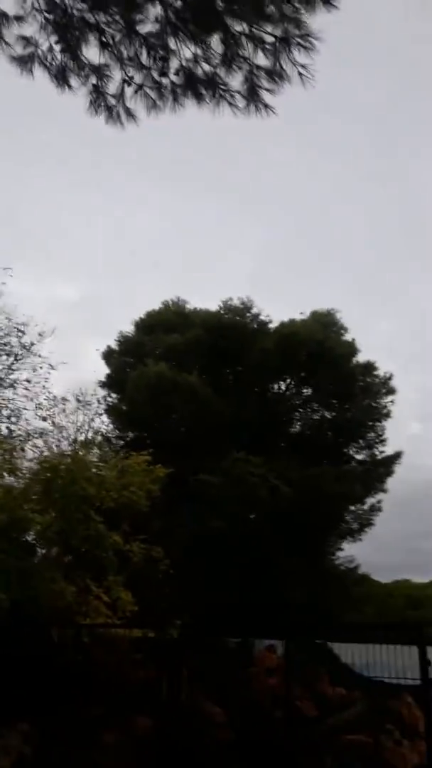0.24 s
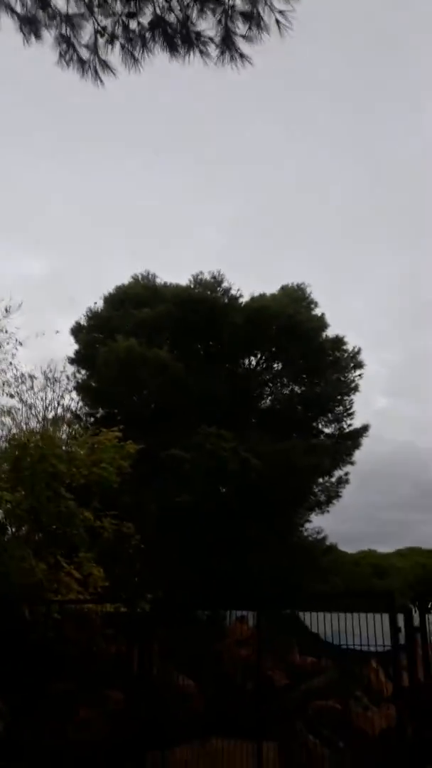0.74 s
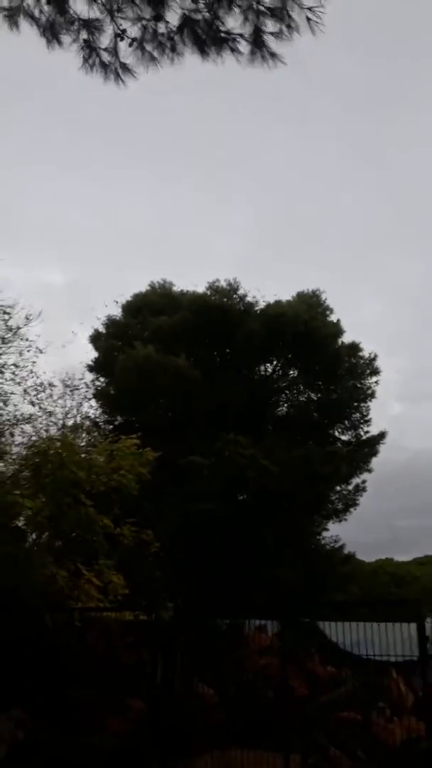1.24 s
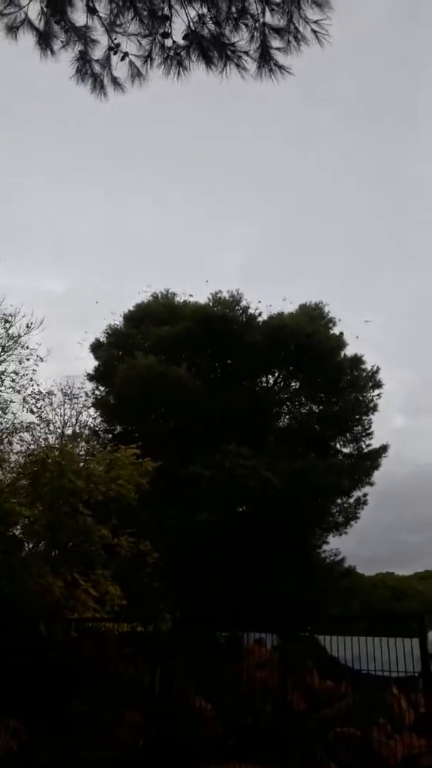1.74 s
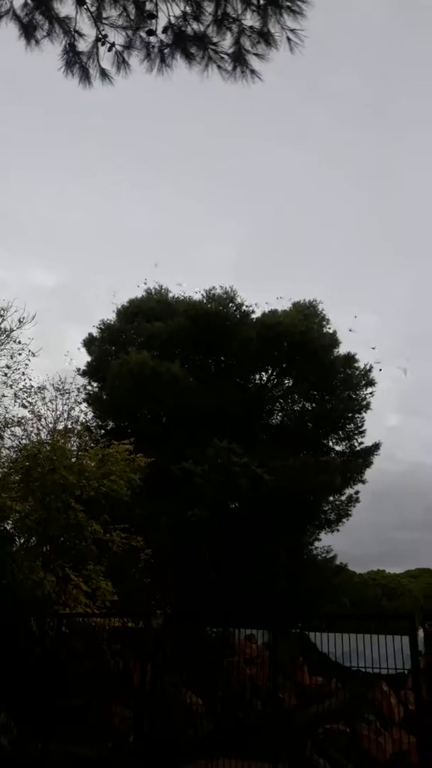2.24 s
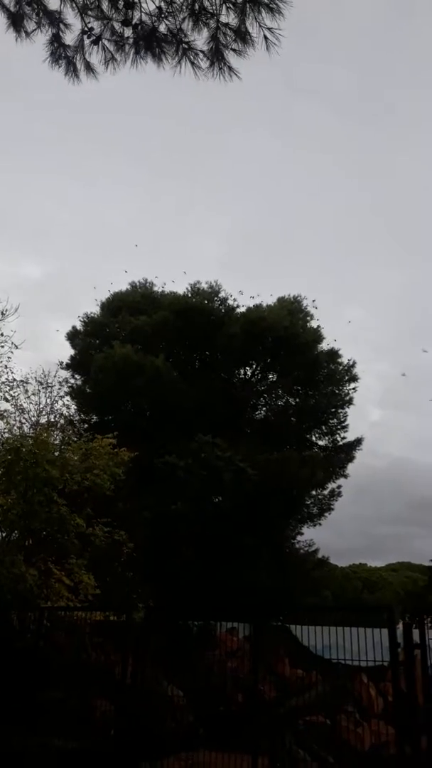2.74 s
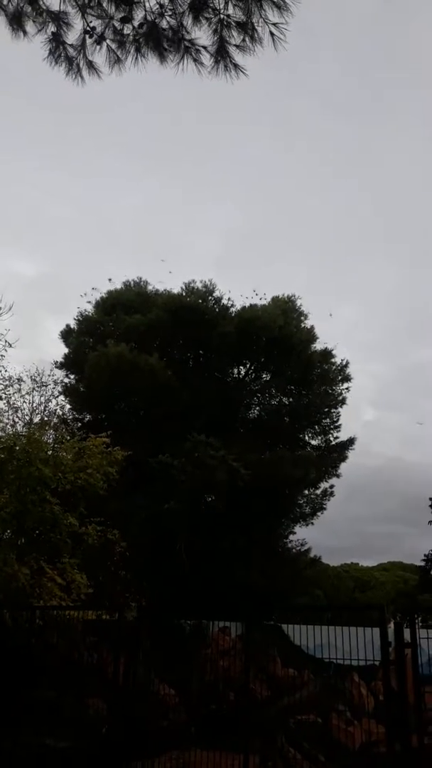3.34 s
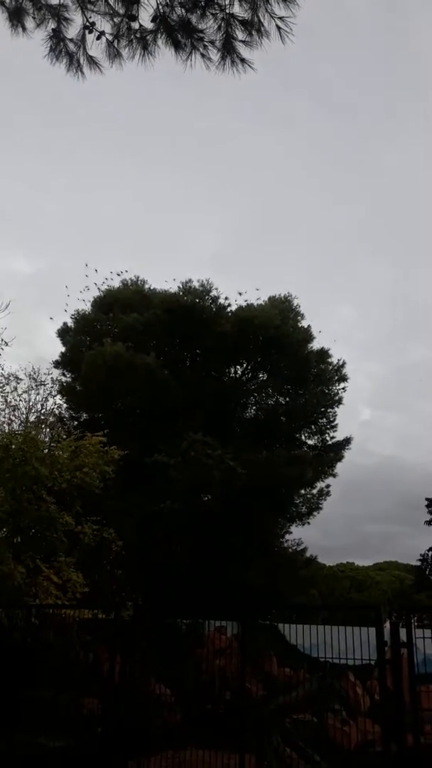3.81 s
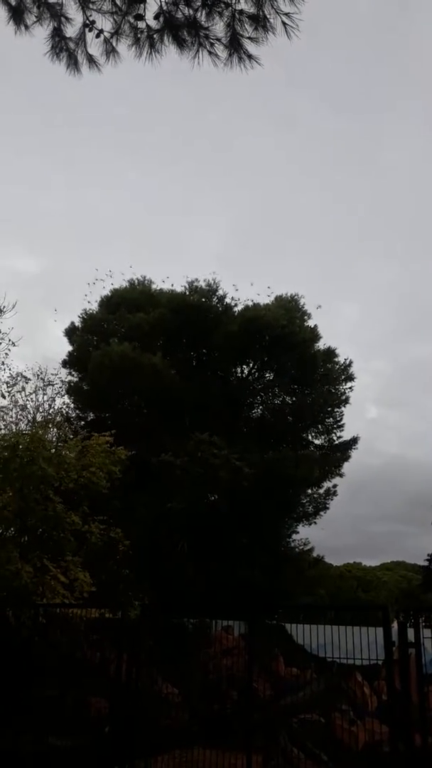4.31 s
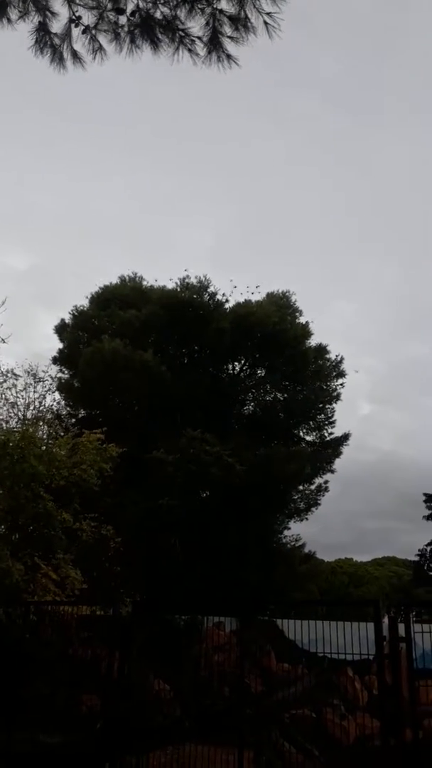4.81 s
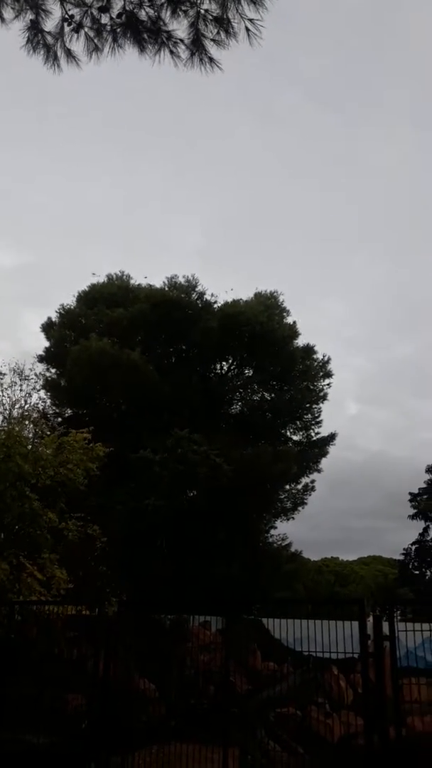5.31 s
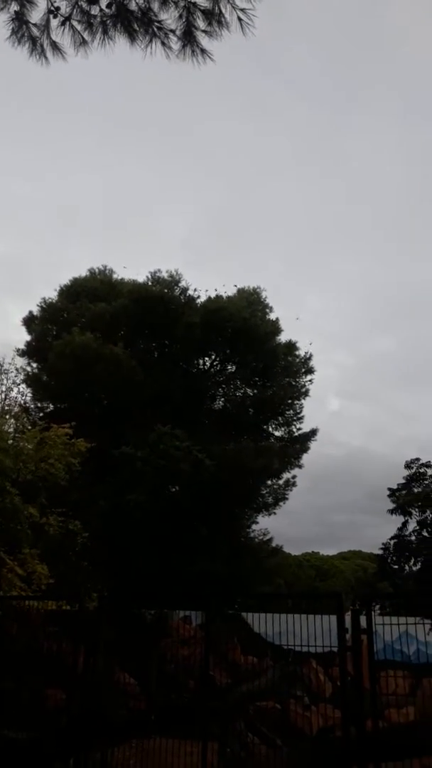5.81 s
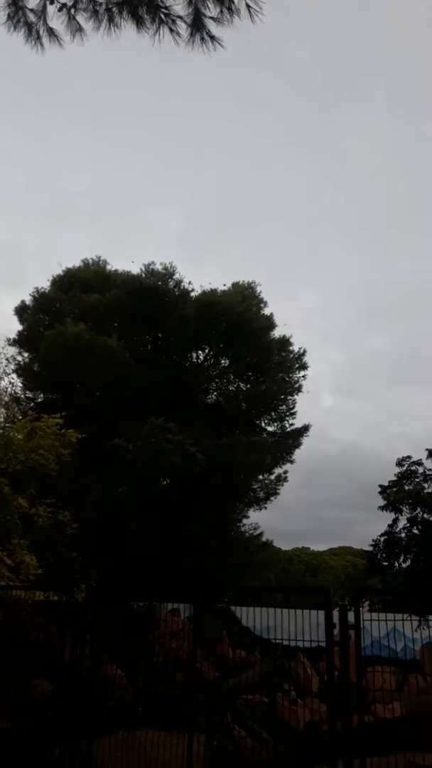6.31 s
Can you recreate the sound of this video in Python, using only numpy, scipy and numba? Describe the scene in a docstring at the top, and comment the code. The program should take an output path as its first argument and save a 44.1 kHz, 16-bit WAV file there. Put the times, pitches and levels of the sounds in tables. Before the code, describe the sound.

A huge flock of starlings chatters in trees across a park for the whole six and a half seconds. Thousands of tiny whistles and rattles blend into a dense, steady hiss, slightly brighter in the first second and a little softer in the middle. Far traffic hums faintly underneath, along with very faint microphone hiss.

Short gliding whistles from nearer birds stand out, with a slight scatter from the trees. Thin, high ones cluster in the first second, the clearest at about 0.5 seconds. Lower ones come around 3 seconds, in a small run from 3.4 to 3.8, and again near 4.9 and 6.

At about 0.6 seconds a finger briefly brushes the phone and knocks it once, dully. Six tiny digital clicks fall between 0.4 and 1.6 seconds, with two more at about 6.2 and 6.5.

```python
"""A huge starling roost in trees across a park: thousands of whistles and rattles a second melt into a hiss.
Each note is a gliding sine; rattles throb; the farthest birds blur into shaped noise.
Nearer whistles stand out, scattered by the trees. Far traffic hums under faint microphone hiss.
A finger brushes the phone and knocks it once; digital glitches click. One microphone, two channels."""
import sys
import numpy as np
from scipy import signal
from scipy.fft import rfft, irfft
from scipy.io import wavfile
from numba import njit

SR = 44100
rng = np.random.default_rng(int(sys.argv[2]) if len(sys.argv) > 2 else 0)


def wav_out(sig):
    """Save sig, one row per channel (or a flat mono array), as 16-bit PCM at SR to the path in sys.argv[1]."""
    wavfile.write(sys.argv[1], SR, np.round(np.clip(np.atleast_2d(sig).T, -1, 1) * 32767).astype(np.int16))


N = 288855

# Far traffic spectrum (frequency [Hz], relative density [dB])
TRAFFIC_SPECTRUM = [(24, -39), (40, -5.5), (81, -1.5), (227, -4), (350, -5), (422, -5.5), (503, -4.5),
                    (599, -3.5), (1000, -5), (1300, -3), (2200, -120)]
# Microphone hiss (time [s], level [dB])
HISS_LEVELS = [(0.0, -58), (1.18, -58), (1.82, -60), (4.34, -59.5), (4.56, -59.5), (6.2, -58.5),
               (6.55, -60)]
# Microphone hiss spectrum (frequency [Hz], relative density [dB])
HISS_SPECTRUM = [(3000, -48), (6000, -15), (10500, -3.5), (12000, -2), (13500, -4), (15800, -3.5)]
# Digital clicks (time [s], impulse level [dB])
GLITCHES = [(.3856, -23), (.5859, -22), (.8676, -20), (1.097, -24), (1.313, -21), (1.5945, -25),
            (6.1918, -22), (6.4893, -29)]
# Finger on the case (mid time [s], spread [s], centre [Hz], width [Hz], level [dB])
BRUSH_SWELLS = [(.575, 0.033, 13000, 6000, -53), (.58, 0.0041, 1760, 600, -31),
                (.601, 0.0096, 1480, 905, -29.5), (.625, 0.0091, 1700, 700, -36),
                (.614, .012, 250, 220, -39), (6.19, .06, 11000, 4000, -63)]
# Nearer birds (time [s], length [s], start pitch [Hz], end pitch [Hz], level [dB])
NEAR_WHISTLES = [ (.13, 0.13, 7450, 7100, -44), (.225, 0.16, 2870, 2880, -42.5),
                 (.462, .05, 7350, 7320, -44), (0.513, .08, 7250, 6100, -35), (.71, .053, 6850, 6670, -41),
                 (.72, .1, 8500, 8000, -53), (.85, .064, 3480, 3420, -41), (1.0, .05, 7400, 7250, -45),
                 (1.002, 0.082, 3100, 2870, -40.5), (1.614, .08, 9200, 8800, -61),
                 (1.99, .1, 8600, 8550, -67), (2.48, .13, 7650, 7600, -55), (2.62, .05, 7200, 7240, -45),
                 (2.925, 0.097, 8550, 8050, -59), (2.96, .14, 3060, 3170, -44.5),
                 (3.408, 0.23, 3470, 2750, -42), (3.48, .085, 2750, 2570, -46),
                 (3.587, 0.12, 3030, 3770, -42), (3.653, .036, 2470, 2290, -38),
                 (3.73, .067, 2430, 2290, -45), (3.96, .07, 12150, 12400, -65),
                 (4.856, 0.13, 2730, 2690, -40), (4.88, .09, 8480, 8420, -64), (5.77, .04, 9000, 8700, -59),
                 (5.99, .08, 2980, 2850, -46)]
# Roost loudness (time [s], base level [dB], treble gain [dB])
ROOST_LEVELS = [(0.0, -28.5, 1.5), (0.33, -29.5, 3.5), (0.42, -30, 3), (0.58, -29, 5), (0.64, -29.5, 3),
                (1.5, -30.5, 1), (2.53, -31.5, 0.5), (3.5, -31, -2), (4.7, -30, 0), (5.6, -30, -.5),
                (6.55, -29, -0.5)]
# Roost spectrum at the microphone (frequency [Hz], relative density [dB])
ROOST_SPECTRUM = [(590, -21.5), (1000, -8.5), (1890, -3), (2400, 0), (3890, -4.5), (4580, -2), (6240, 0.5),
                  (6870, -4), (7940, -17), (10000, -30.5), (13000, -62), (22000, -120)]
# Air absorption on the farthest birds (frequency [Hz], gain [dB])
AIR_ABSORPTION = [(6800, 0), (8500, -6)]


def undb(db):
    return 10 ** (np.asarray(db) / 20)


def level(x, rms_db):
    return x * undb(rms_db) / np.sqrt(np.mean(x ** 2))


def curve(table):
    """Columns of a time table, one value a sample."""
    time_s, *columns = np.transpose(table)
    return [np.interp(np.arange(N) / SR, time_s, column) for column in columns]


def colour(x, spectrum):
    """Filter by (frequency [Hz], gain [dB]) points."""
    hz, db = np.transpose(spectrum)
    bins_hz = np.maximum(np.fft.rfftfreq(len(x), 1 / SR), 1)
    return irfft(rfft(x) * undb(np.interp(np.log(bins_hz), np.log(hz), db)), len(x))


def band(x, hz, width_hz):
    """Resonance, unity gain at the centre."""
    return signal.lfilter(*signal.iirpeak(hz, hz / width_hz, SR), x)


def slow_noise(cutoff_hz):
    """Low-passed noise, unit rms."""
    return level(signal.lfilter(*signal.butter(2, cutoff_hz, fs=SR), rng.standard_normal(N)), 0)


def mic_hiss(flicker_db=0.9, flicker_hz=14):
    """Faint, thin microphone hiss with a slight flicker."""
    hiss = level(colour(rng.standard_normal(N), HISS_SPECTRUM), 0)
    return hiss * undb(curve(HISS_LEVELS)[0] + flicker_db * slow_noise(flicker_hz))


def traffic(rms_db=-46):
    """Steady hum of far traffic."""
    return level(colour(rng.standard_normal(N), TRAFFIC_SPECTRUM), rms_db)


def digital_clicks():
    """Single-sample glitches with a bright edge."""
    impulses = np.zeros(N)
    for time_s, db in GLITCHES:
        impulses[int(time_s * SR)] = undb(db)
    return 2 * band(impulses, hz=10500, width_hz=12000)


def brush():
    """Skin rubs the case: short swells of band noise."""
    out, time_s = np.zeros(N), np.arange(N) / SR
    for mid_s, spread_s, hz, width_hz, db in BRUSH_SWELLS:
        friction = band(band(rng.standard_normal(N), hz, width_hz), hz, width_hz)
        out += level(friction, db) * np.exp(-.5 * ((time_s - mid_s) / spread_s) ** 2)
    return out


def knock(onset_s=.606, hz=155, t60_s=.045, gain_db=-21):
    """Dull case knock; a soft fingertip builds the swing over one cycle."""
    age_s = np.maximum(np.arange(N) / SR - onset_s, 0)
    envelope = (1 - np.exp(-hz * age_s)) * np.exp(-np.log(1000) * age_s / t60_s)
    return undb(gain_db) * envelope * np.sin(2 * np.pi * hz * age_s)


@njit
def sing(notes):
    """Bird notes: sines with parabolic pitch and soft ends; a rattle's throb adds sidebands."""
    out = np.zeros(N)
    for onset_s, length_s, start_hz, mid_hz, end_hz, rms, rattle_hz in notes:
        first, count = int(onset_s * SR), int(length_s * SR)
        slope_hz = 4 * mid_hz - 3 * start_hz - end_hz
        bend_hz = 2 * (start_hz + end_hz - 2 * mid_hz)
        phasor = 1. + 0j
        for block in range(0, count, 16):
            progress = block / count
            hz = start_hz + slope_hz * progress + bend_hz * progress ** 2
            turn = np.exp(2j * np.pi * hz / SR)
            gain = np.sqrt(2) * rms * min(2 * np.sin(np.pi * progress), 1.)
            if rattle_hz > 0:
                gain *= np.sqrt(2) * np.cos(np.pi * rattle_hz * block / SR)
            for i in range(first + block, first + min(block + 16, count)):
                phasor *= turn
                if 0 <= i < N:
                    out[i] += gain * phasor.imag
    return out


def trees(x, t60_s=.25, tail_db=-10):
    """Branches and trunks scatter sound into a short diffuse tail."""
    time_s = np.arange(SR // 2) / SR
    tail = rng.standard_normal(len(time_s)) * np.exp(-np.log(1000) * time_s / t60_s)
    tail *= undb(tail_db) / np.sqrt(np.sum(tail ** 2))
    return x + signal.fftconvolve(x, tail)[:N]


def twitter_notes(notes_per_s=10):
    """Faint, high random notes; columns as in NEAR_WHISTLES."""
    count = int(notes_per_s * N / SR)
    pitch, fall, stretch, loudness = rng.standard_normal((count, 4)).T
    onset_s = rng.random(count) * N / SR
    length_s = .098 * np.exp(.31 * stretch)
    start_hz = 8550 + 250 * pitch
    end_hz = start_hz - 200 * (1 + fall)
    level_db = -68 + 2 * loudness
    return np.column_stack([onset_s, length_s, start_hz, end_hz, level_db])


def whistles(mid_glide_share=.64, hoarse_above_hz=7800):
    """Nearer glides and twitter; airflow flutters the amplitude, most in high notes."""
    onset_s, length_s, start_hz, end_hz, db = np.vstack([NEAR_WHISTLES, twitter_notes()]).T
    mid_hz = start_hz + mid_glide_share * (end_hz - start_hz)
    no_rattle = np.zeros_like(onset_s)
    notes = np.column_stack([onset_s, length_s, start_hz, mid_hz, end_hz, undb(db), no_rattle])
    high = start_hz > hoarse_above_hz
    flutter = slow_noise(cutoff_hz=150)
    clear = sing(notes[~high]) * (1 + .25 * flutter)
    hoarse = sing(notes[high]) * (1 + .7 * flutter)
    return trees(clear + hoarse)


def chorus(notes_per_s=2500, arch_hz=302.3, fall_hz=401.4, rattle_share=.55, spread_db=1.5):
    """Dense random starling notes, mostly arched and falling; unit rms."""
    span_s = N / SR + 1  # 1 s lead-in
    count = int(notes_per_s * span_s)
    when, pitch, kind, nearness = rng.random((count, 4)).T
    stretch, arch, fall, pace = rng.standard_normal((count, 4)).T
    onset_s = when * span_s - 1
    length_s = .05 * np.exp(.4 * stretch)
    mid_hz = 400 + 10200 * pitch
    start_hz = mid_hz - arch_hz * np.abs(arch)
    end_hz = mid_hz - fall_hz * (1 + fall)
    rms = undb(-spread_db * np.log(1 - nearness))
    rattle_hz = np.where(kind < rattle_share, 89.1 * np.exp(.403 * pace), 0)
    notes = np.column_stack([onset_s, length_s, start_hz, mid_hz, end_hz, rms, rattle_hz])
    return level(colour(sing(notes), ROOST_SPECTRUM), 0)


def roost(far_power_share=.61, treble_hz=6650):
    """Chorus plus a noise blur of birds too far and too many to tell apart."""
    voices = chorus()
    blur = colour(rng.standard_normal(N), ROOST_SPECTRUM)
    blur = level(colour(blur, AIR_ABSORPTION), 0)
    chatter = np.sqrt(1 - far_power_share) * voices + np.sqrt(far_power_share) * blur
    base_db, treble_db = curve(ROOST_LEVELS)
    treble = signal.sosfiltfilt(signal.butter(4, treble_hz, "high", fs=SR, output="sos"), chatter)
    return undb(base_db) * (chatter + (undb(treble_db) - 1) * treble)


def scene():
    """Mono mix on two channels."""
    mono = roost() + whistles() + traffic() + mic_hiss() + digital_clicks() + brush() + knock()
    return np.stack([mono, mono])


def record(dry):
    """Phone response: deep bass cut, steep top cut."""
    low_cut_hz, top_cut_hz = 60, 15820
    thin = signal.sosfilt(signal.butter(2, low_cut_hz, "high", fs=SR, output="sos"), dry)
    return signal.sosfiltfilt(signal.ellip(14, .15, 45, top_cut_hz, fs=SR, output="sos"), thin)


dry = scene()
out = record(dry)
wav_out(out)
```